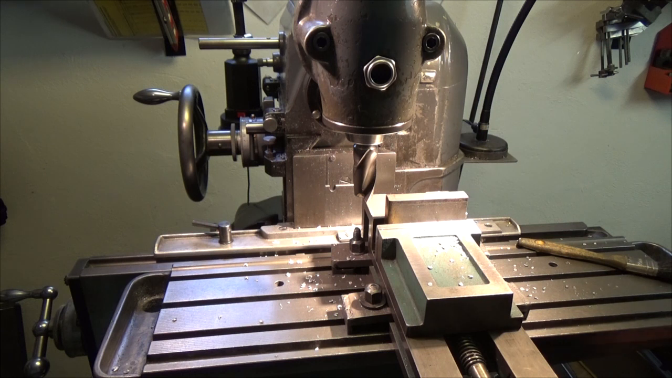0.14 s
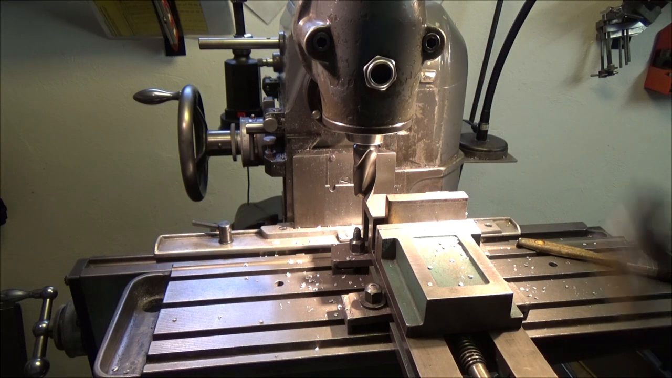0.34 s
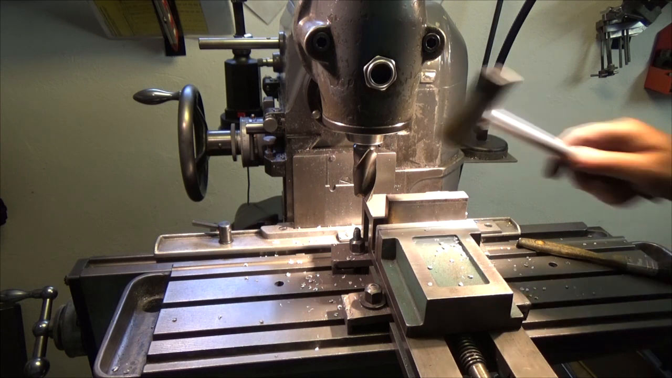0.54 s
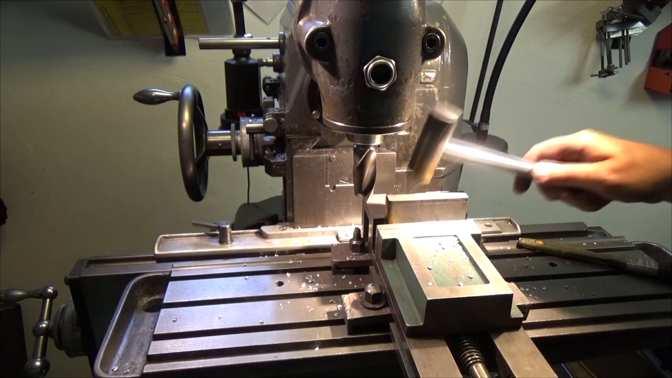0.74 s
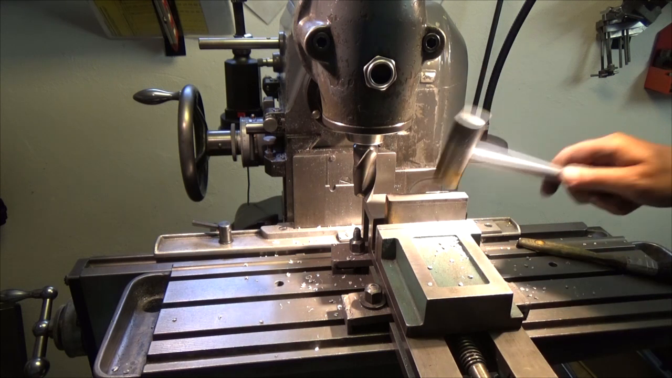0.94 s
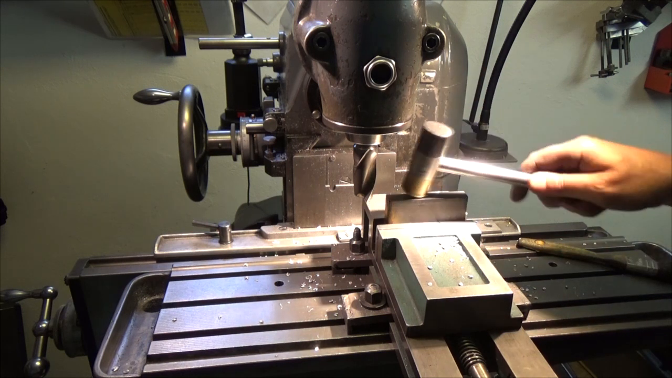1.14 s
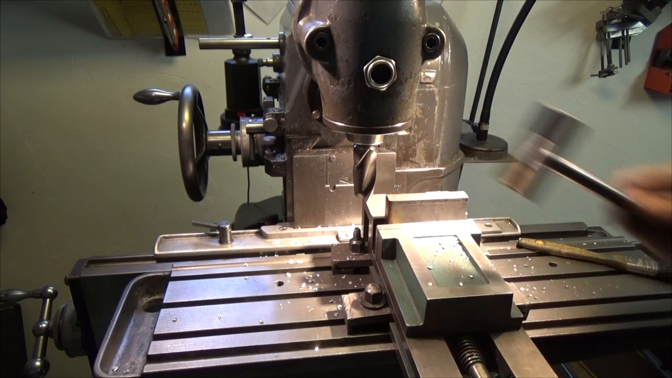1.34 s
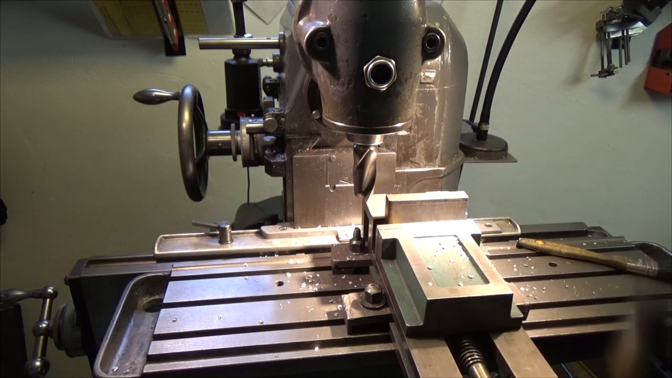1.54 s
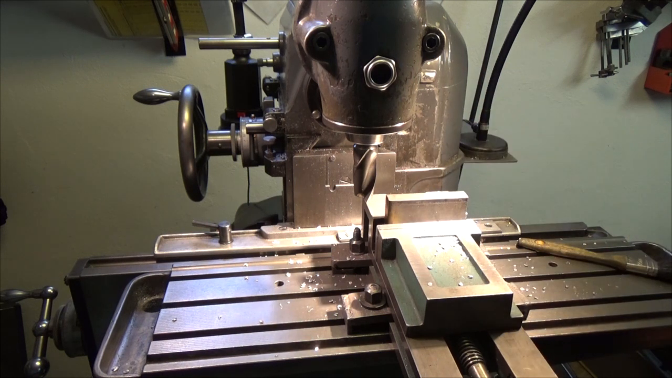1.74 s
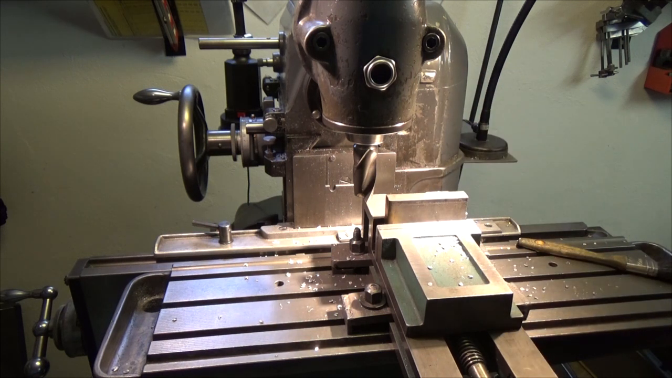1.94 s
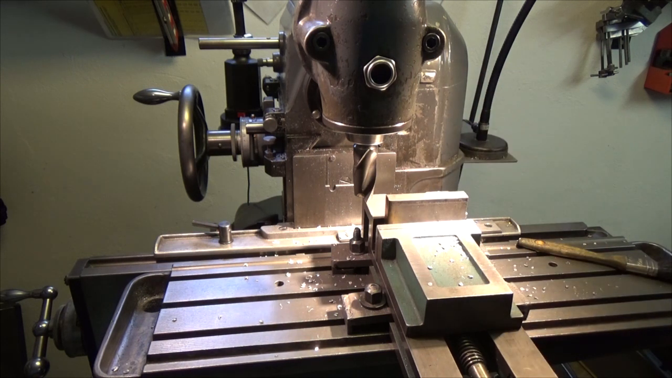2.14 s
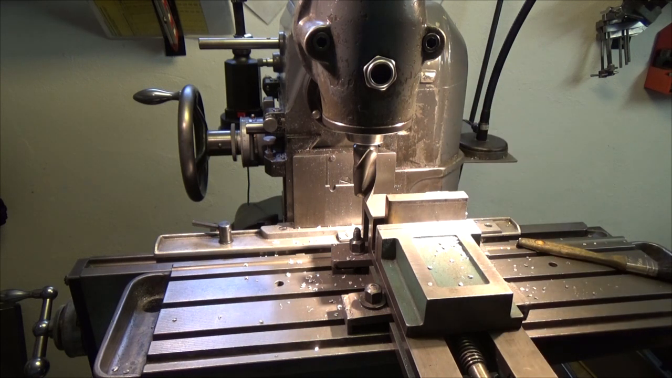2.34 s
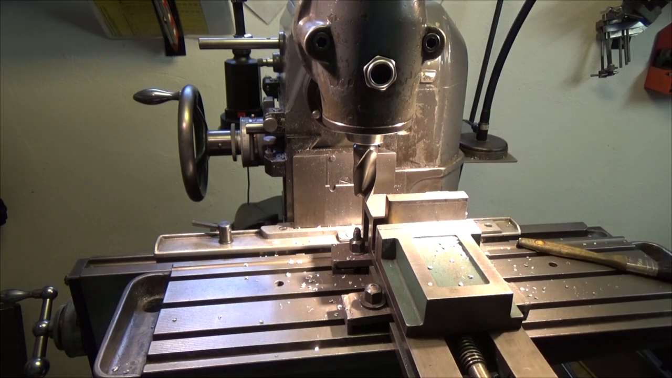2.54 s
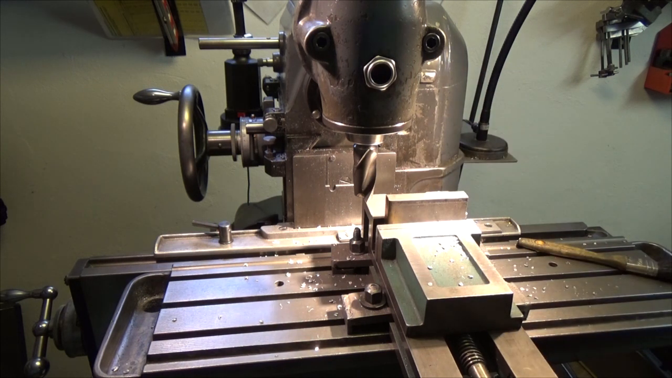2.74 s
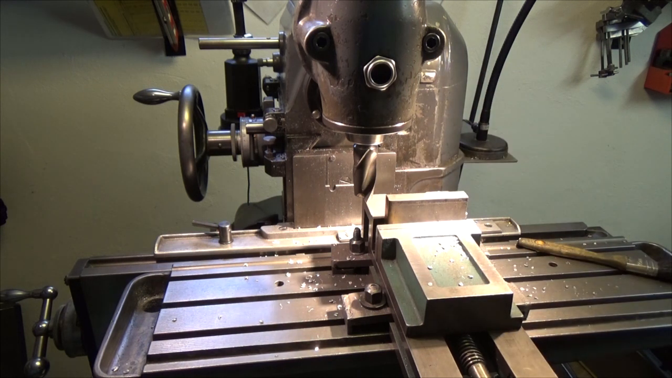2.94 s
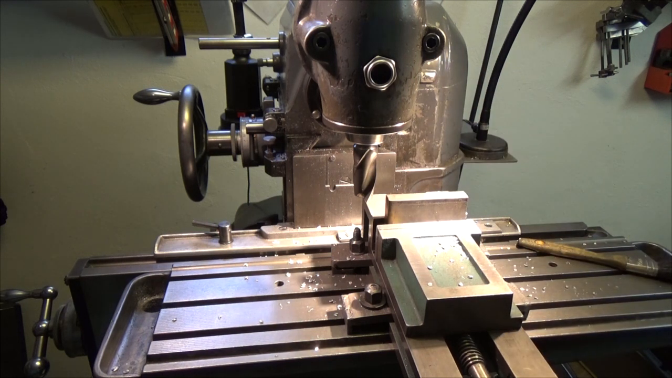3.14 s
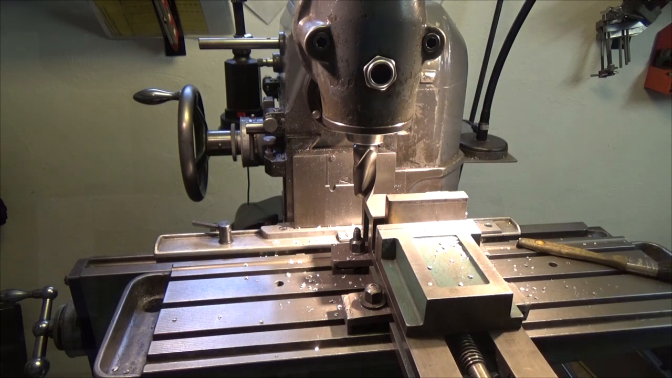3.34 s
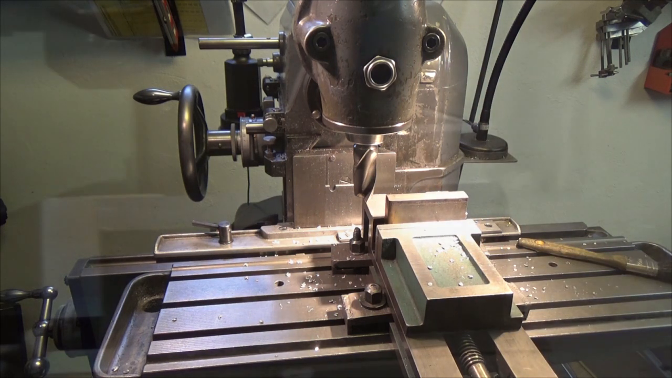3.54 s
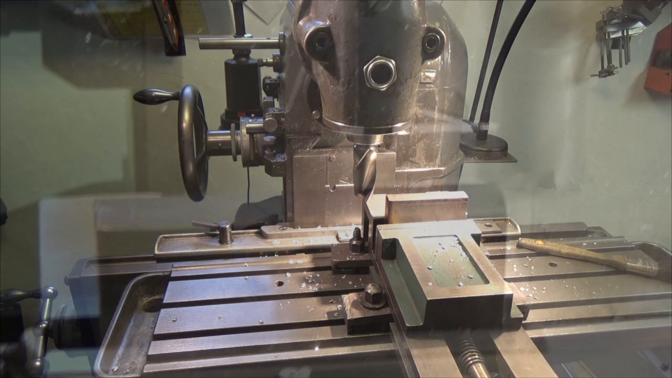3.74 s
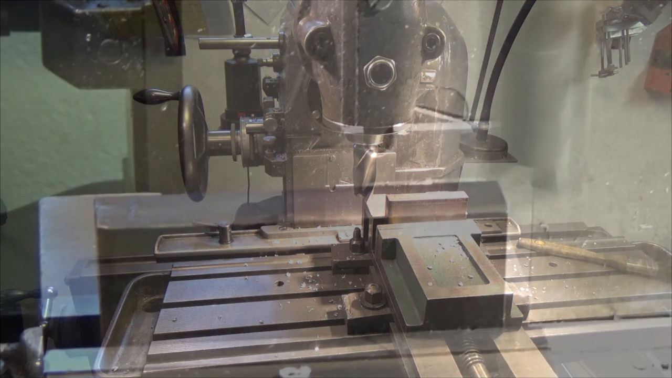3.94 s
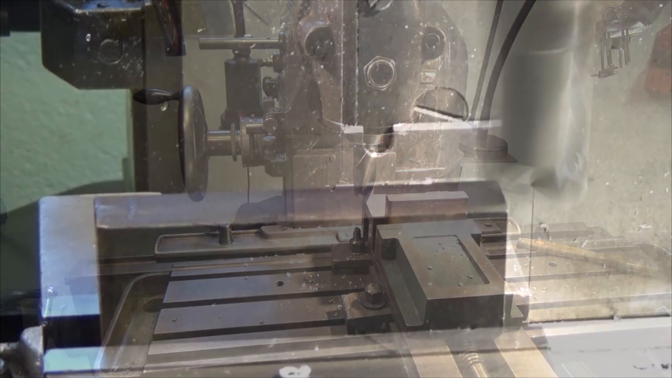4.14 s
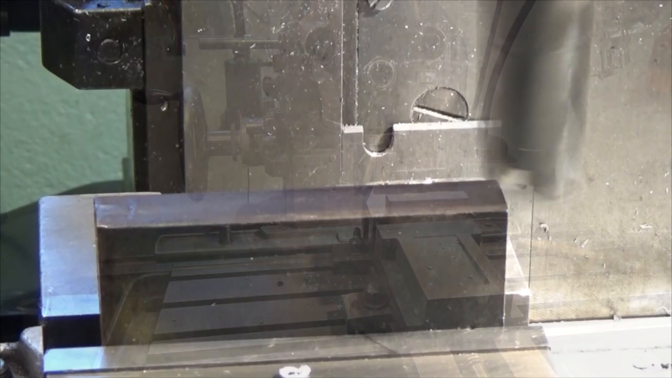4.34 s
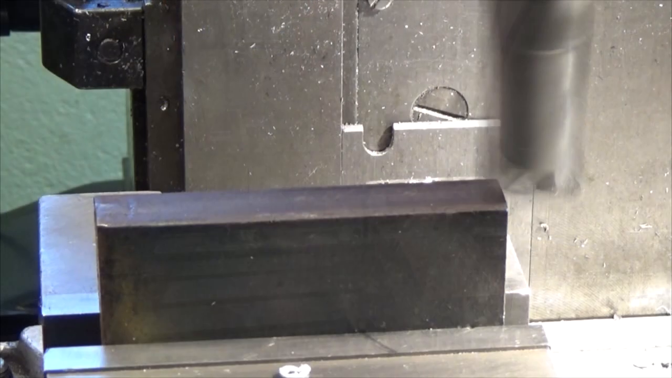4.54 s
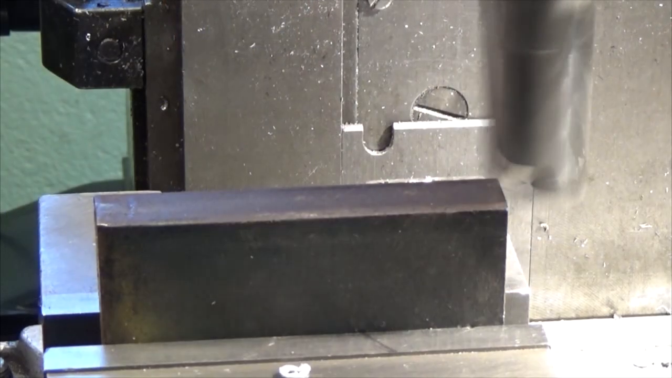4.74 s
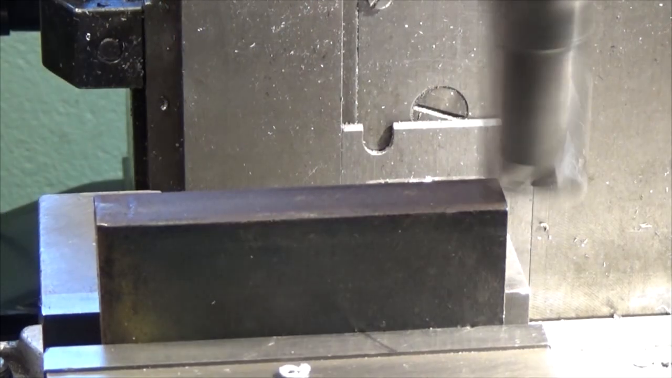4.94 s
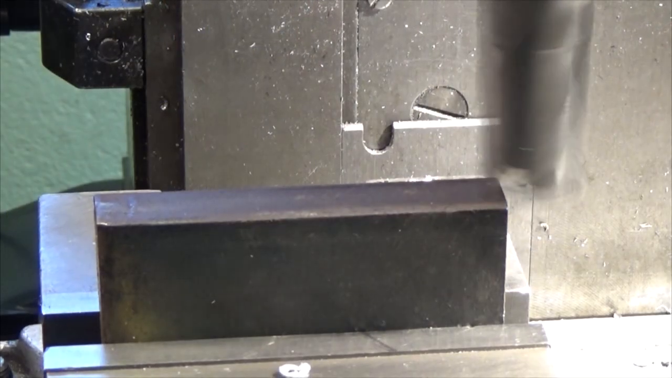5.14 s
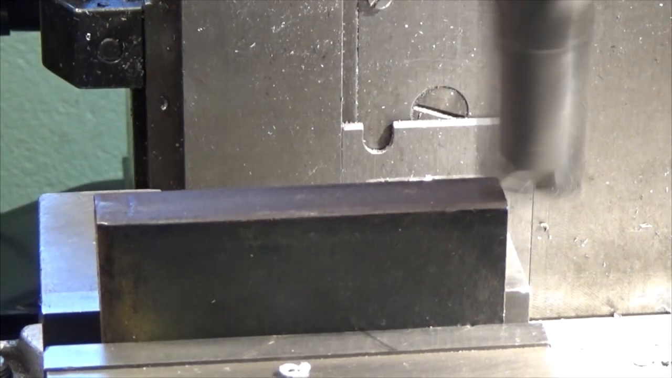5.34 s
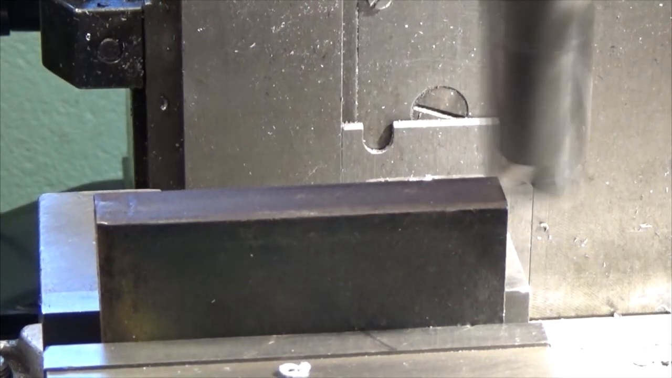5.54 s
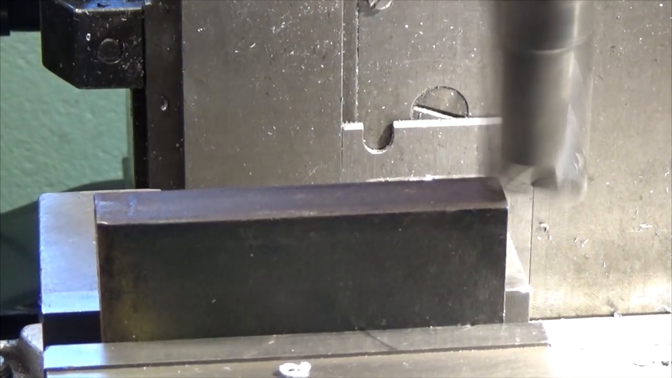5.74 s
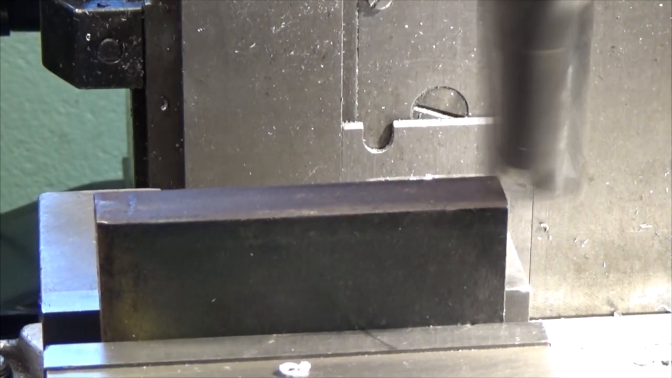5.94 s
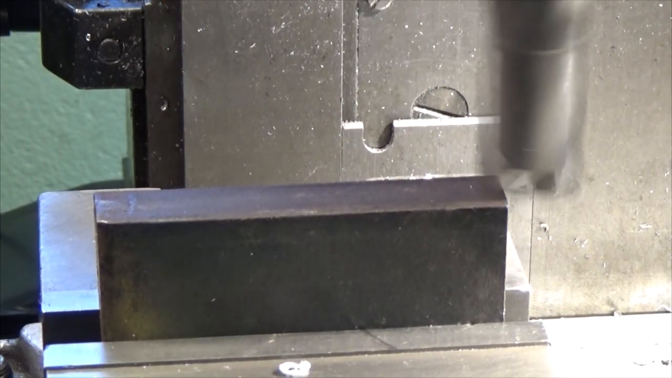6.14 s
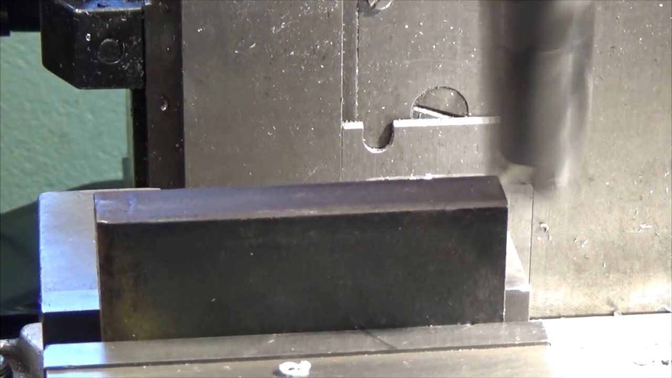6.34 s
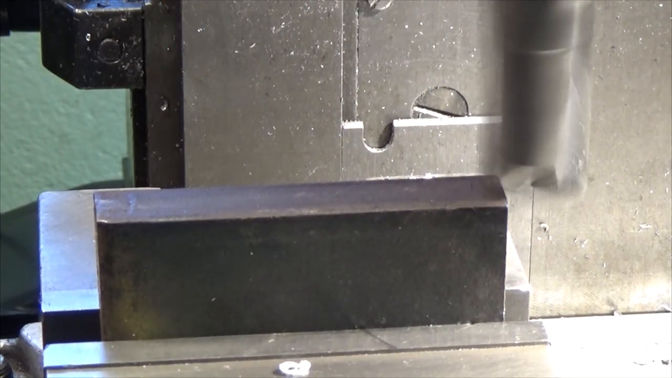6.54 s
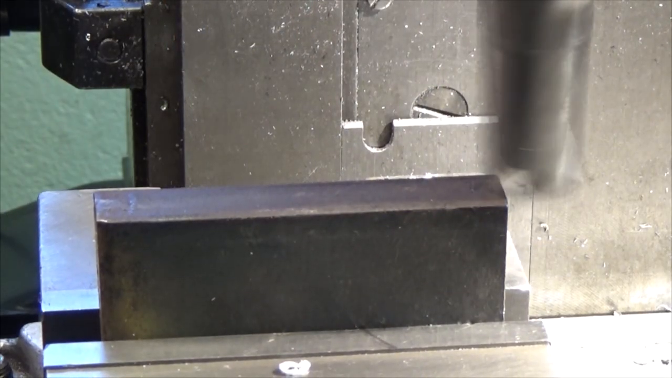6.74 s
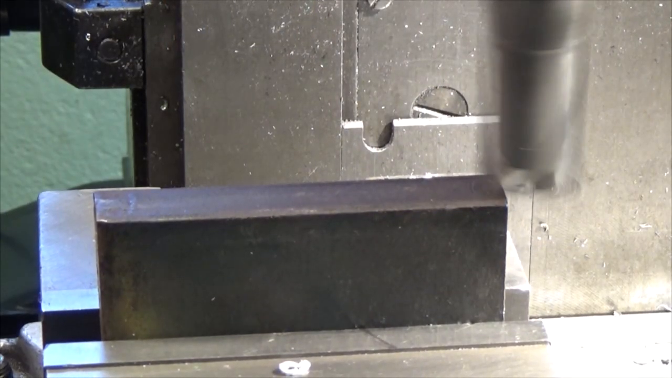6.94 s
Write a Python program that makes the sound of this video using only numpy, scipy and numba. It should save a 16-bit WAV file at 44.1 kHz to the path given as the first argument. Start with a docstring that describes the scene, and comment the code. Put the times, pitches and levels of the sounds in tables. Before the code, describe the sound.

In a quiet small workshop, a faint knock precedes three quick, loud hammer blows on steel, each a bright crash with a ringing vice. The hammer is dropped with a jingling clatter and wooden knocks. A milling machine then fades in, whining and rumbling with a steady bright hiss, amid a few loose metallic clinks. The hammering is heard from a step back, the mill up close.

```python
"""A light knock on a bench, then three hammer blows that seat a steel block in a milling vice.
The hammer clatters down on the bench; then loose metal clinks and the running mill fades in.
Blows are coloured noise with decaying modes; gear tones are fluttering sines over a rumble, and the
cutter is noise that swells once a turn and drives resonances. A fast limiter flattens every blow,
so the room rings up behind it."""
import sys
import numpy as np
from scipy import signal
from scipy.fft import rfft, irfft, next_fast_len
from scipy.io import wavfile
from scipy.ndimage import uniform_filter1d
from numba import njit

SR = 44100
rng = np.random.default_rng(int(sys.argv[2]) if len(sys.argv) > 2 else 0)


def generate_wav(sig):
    """Save sig (samples, or channels by samples) to the path in sys.argv[1] as 16-bit PCM at SR."""
    pcm = np.round(np.clip(np.atleast_2d(sig).T, -1, 1) * 32767).astype(np.int16)
    wavfile.write(sys.argv[1], SR, pcm)


N = 307818
T = np.arange(N) / SR
TAIL = T[:int(1.5 * SR)]  # time axis of one hit

# Room air spectrum: (frequency [Hz], level [dB])
AIR_SPECTRUM = [(25, -25), (60, -1), (95, 3.5), (200, 2), (350, -4), (600, -8), (1200, -10.5),
                (2500, -18.5), (6000, -21.5), (11000, -21.5), (16000, -25)]
# Soft strokes of a hand along the tool: (middle [s], level [dB], length [s])
BRUSHES = [(1.603, -60, 0.052), (1.8, -66, .15), (2.035, -53.5, 0.34)]
# Room reverberation time before stretching: (frequency [Hz], T60 [s])
ROOM_T60 = [(100, 0.57), (260, 0.38), (700, 0.39), (1840, 0.32), (4850, 0.34), (12800, 0.15)]
# Side signal facing the bench: (frequency [Hz], side relative to mid [dB])
PORTS_WIDE = [(60, -19), (200, -22), (1300, -26), (4400, -26), (8000, -15.5), (15000, -60)]
# Side signal facing the cutter: (frequency [Hz], side relative to mid [dB])
PORTS_CLOSE = [(60, -10), (380, -31), (700, -43), (3000, -94), (5500, -17.5), (9000, -14.5), (15000, -45)]
# Motor and gear tones: (frequency [Hz], level [dB], unsteady share [0-1], flutter rate [Hz])
GEAR_TONES = [(95, -36, .3, 5), (212.3, -22, .5, 10), (300.6, -19.5, .5, 10), (529.2, 0, .24, 34),
              (881, -11.3, .5, 22), (985.5, -19.5, .8, 25), (1085.5, -20.5, .8, 30), (1401, -11.8, .9, 42),
              (2060, -20, .92, 45)]
# Bearing rumble spectrum: (frequency [Hz], level [dB])
RUMBLE_SPECTRUM = [(30, -13), (70, -56), (120, -11.5), (200, -4), (310, 5), (450, 1.5), (520, 10.5),
                   (610, 7.5), (690, -3), (850, 4), (1100, -2), (1400, 1.5), (1600, -4), (2200, -6),
                   (4000, -17), (6000, -50)]
# Cutting hiss spectrum: (frequency [Hz], level [dB])
HISS_SPECTRUM = [(1500, -20), (3000, -11), (3900, -12), (4400, -8.5), (4980, -6.5), (5200, 1), (6100, 1.5),
                 (6650, -2.5), (7600, -2.5), (9000, -.7), (10800, -.7), (12000, -5), (13500, -13),
                 (15800, -23)]
# Resonances of cutter and spindle: (frequency [Hz], level [dB])
CUTTER_MODES = [(5164, -2), (5238, 0), (5764, -3), (5923, 0), (6109, 2), (7903, -1), (8091, -2), (8823, -2),
                (8979, -2), (9259, -1), (10110, 0), (10541, -1), (11337, -3), (11682, -2), (12414, -5)]
# Loose metal by the mill: (time [s], clatter [dB], tilt [dB/octave], ring [dB], piece [name])
CLINKS = [(4.026, -19, -0.2, -29, "plate"), (4.078, -35, -1, -24, "washer"),
          (4.187, -24, 4.5, -27.5, "bar"), (4.195, -28, 10, -25, "nut"), (4.249, -28.5, -1.5, -22.5, "bar"),
          (4.274, -24, 9, -33, "pin"), (4.355, -25.5, 4, -27, "rod"), (6.53, -34, -4, -45, "guard"),
          (6.64, -29, -3.5, -35, "guard")]
# Modes of each loose piece of steel, by name: (frequency [Hz], level [dB], T60 [s])
PIECE_MODES = {"plate": [(3950, 0, .3), (4960, -4, .25)], "washer": [(6600, 0, .2), (8780, -1, .12)],
               "nut": [(6245, 0, .15), (8600, -1, .15)], "bar": [(4480, 0, .28), (13620, 0, .3)],
               "pin": [(10387, 0, .4), (12667, -3, .4)], "rod": [(3378, 0, .35), (12667, -1, .4)],
               "guard": [(1500, -3, .1), (1760, 0, .1), (2320, -3, .1)]}
# Tools knocking on the bench: (time [s], force [dB], contact pitch [Hz], tilt [dB/octave],
# crack relative to wash [dB], board ring [dB], shaft ring [dB])
KNOCKS = [(0.002, -29, 1650, -.5, 5, -26, -27.5), (2.19, -4, 1510, -0.6, 9.5, -29, -26),
          (2.208, -9.5, 2500, 1.5, 0, -37, -9), (2.247, -11.5, 8550, 6, 10.5, -50, -6.5),
          (2.265, -17.5, 5300, 0.7, 0, -50, -16), (2.341, -27.5, 10000, -2, 7, -49.5, -37),
          (2.412, -7, 775, 0, -3.5, -24, -33), (2.465, -11.5, 664, 0.9, 2, -25, -23),
          (2.731, -42.5, 850, -3, 9, -75, -66), (2.792, -45.5, 1210, -4, 6, -75, -71.5),
          (3.009, -49.5, 1100, -1.7, 6, -70, -72)]
# Knock spectrum without its contact resonance: (frequency [Hz], level [dB])
KNOCK_SPECTRUM = [(60, -37), (170, 1), (350, 2.5), (700, -3.5), (1600, -2), (3500, -8), (6000, -6.5),
                  (10000, -4), (13000, -12), (16000, -23)]
# Modes of the wooden bench: (frequency [Hz], level [dB], T60 [s])
BENCH_MODES = [(210, -4, .22), (238, 0, .2), (318, -17, .5), (503, -10, .38), (689, -13, .25),
               (915, -14, .18)]
# Modes of the hammer's steel shaft: (frequency [Hz], level [dB], T60 [s])
SHAFT_MODES = [(1106, -12, .12), (1301, -12, .12), (1673, -13, .12), (8300, -9, .04), (8750, -9, .04),
               (9420, -2, .11), (9620, -5, .09), (10020, -4, .1), (11100, -8, .05), (12430, -3, .13),
               (13950, -9, .12)]
# Modes of the hammer's head: (frequency [Hz], level [dB], T60 [s])
HEAD_MODES = [(940, -4, .25), (1168, -1, .27), (1460, -4, .22), (1766, -1, .22), (2223, -7, .22),
              (2912, -6, .18), (3348, -10, .2), (4533, -11, .18)]
# Modes of other tools jingling on the bench: (frequency [Hz], level [dB], T60 [s])
JINGLE_MODES = [(5782, -5, .22), (6406, -8, .27), (8533, -6, .22), (9781, 0, .19), (10900, -7, .17),
                (11710, -5, .16), (12414, -2, .18)]
# Soft, dull bumps on the bench: (time [s], level [dB], pitch [Hz], T60 [s])
THUDS = [(2.367, -18.5, 241, .17), (3.069, -38.5, 316, .05)]
# Low booms of the bench top: (time [s], level [dB])
BOOMS = [(2.465, -37.5), (3.072, -46.5)]
# Hammer blows on the block: (time [s], force [dB], tilt [dB/octave], graze before it [dB],
# vice ring relative to force [dB])
BLOWS = [(0.732, -4.5, 0.5, -31.5, -9), (0.926, -2.5, 2.4, -34, -12.5), (1.114, -5.5, -0.15, -36, -6)]
# Spectrum of steel struck by steel: (frequency [Hz], level [dB])
BLOW_SPECTRUM = [(35, -68), (70, -27), (150, -12.5), (340, -7), (470, -13.5), (900, -8.5), (1450, -5.5),
                 (2850, -7), (3400, -4), (3900, -8), (5500, -11), (6200, -4.5), (7200, -12), (10200, -13.5),
                 (13000, -24.5), (14200, -22.5), (16000, -39)]
# Modes of the vice and machine table: (frequency [Hz], level [dB], T60 [s])
VICE_MODES = [(149, -13, .65), (213, -13, .5), (343, -11, .5), (716, -18, .55), (926, -37, 1.6),
              (1022, -12, .4), (1061, -37, 1.4), (1238, -28, 1.1), (1421, -6, .35), (1451, -5, .35),
              (1616, -9, .3), (1728, -2, .36), (2232, -9, .33), (2590, -9, .36), (3203, -7, .3),
              (3311, -2, .38), (3365, -7, .35), (3440, -7, .3), (3567, -8, .3), (4090, -12, .33),
              (6178, -11, .3), (10100, -14, .3)]

AIR_DB, HUM_DB, HUM_HZ = -54.5, -53.0, 300.5
BUILD_CYCLES, RING_UP_CYCLES = 1, 0.23  # time constants of onset, in periods: room bands, modes
TURN_HZ, BITE_S = 9.21, 5.968  # spindle speed, and a moment when the swell peaks
GEAR_TURN_HZ, GEAR_SLACK_S = 4.46, 6.287  # gear speed, and a moment when the whine dips
WHINE_DB, RUMBLE_DB, HISS_DB = -23.5, -5.5, -22.5  # rumble is relative to the whine
NOD_DB, SPINDLE_NOD_DB = 1.5, 0.48  # level swing, twice per gear turn and twice per spindle turn
REPEAT_SHARE = 0.76  # part of the flutter that comes back with every gear turn
FADE_START_S, FADE_S, FADE_CURVE = 3.222, 1.08, 0.79
LOAD_FROM_S, LOAD_RISE_S = 5.0, 1.0  # the cutter bites into the block
LOAD_SAG = .003  # fraction by which full load lowers the gear tones
SWELL_IDLE_DB, SWELL_LOAD_DB = 1, 0.3  # once-a-turn swell of the hiss, and what the load adds
CONTACT_DB, CONTACT_OCTAVES = 6.5, 0.89  # height and width of the resonance at the contact
HEAD_DB, JINGLE_DB = -10, -12.5  # relative to the force of the knock
THUD_ROOM_DB, THUD_ROOM_TILT_DB = -8.5, -4  # echo relative to the thud, and its dB per octave
BOOM_HZ, BOOM_T60 = 96, 1.54
TOP_HZ = 15750


def undb(db):
    """Level to amplitude: 20 dB is a factor of ten."""
    return 10 ** (np.asarray(db) / 20)


def unit(x):
    """Power normalization: scale to rms 1."""
    return x / np.sqrt(np.mean(x ** 2))


def punch(x):
    """Onset normalization: scale a hit so that its first 20 ms have rms 1."""
    return x / np.sqrt(np.mean(x[:SR // 50] ** 2))


def decay(t, t60):
    """Exponential damping: the amplitude falls by 60 dB in one T60."""
    return np.exp(-np.log(1000) * t / t60)


def along(points, hz):
    """Logarithmic frequency scale: interpolate (Hz, value) points along it."""
    f, value = np.transpose(points)
    return np.interp(np.log(hz + 1), np.log(f), value)


def colour(x, points, tilt_db=0):
    """Linear filtering: multiply the spectrum by a curve, tilted in dB per octave about 3 kHz."""
    size = next_fast_len(len(x) + SR // 2)
    hz = np.fft.rfftfreq(size, 1 / SR)
    gain_db = along(points, hz) + tilt_db * np.log2((hz + 100) / 3000)
    return irfft(rfft(x, size) * undb(gain_db), size)[:len(x)]


def band(x, lo_hz, hi_hz):
    """Causal band-pass: pass one range of frequencies without sounding ahead of the input."""
    edges = [lo_hz, min(hi_hz, SR / 2 - 100)]
    return signal.sosfilt(signal.butter(3, edges, "band", fs=SR, output="sos"), x)


def walk(rate):
    """Band-limited chance: random steps at a rate in Hz, smoothed twice and scaled to rms 1."""
    k = int(SR / rate)
    steps = np.repeat(rng.standard_normal(N // k + 1), k)
    return unit(uniform_filter1d(uniform_filter1d(steps, k), k)[:N])


def add(out, s, x):
    """Superposition: mix x in at time s."""
    i = max(int(s * SR), 0)
    out[i:i + len(x)] += x[:N - i]


def wash(stretch):
    """Diffuse reverberation: in dense ringing and echoes the bass builds late, the treble dies first."""
    edges = np.geomspace(50, 20000, 9)
    noise = rng.standard_normal(len(TAIL))
    total = np.zeros(len(TAIL))
    for lo, hi in zip(edges, edges[1:]):
        hz = np.sqrt(lo * hi)
        build = 1 - np.exp(-TAIL * hz / BUILD_CYCLES)
        total += band(noise, lo, hi) * build * decay(TAIL, stretch * along(ROOM_T60, hz))
    return total


def impact(stretch, crack_db, crack_s):
    """Impulsive excitation: a brief broadband crack of contact joined to its wash."""
    crack = rng.standard_normal(len(TAIL)) * np.exp(-TAIL / crack_s)
    return wash(stretch) + undb(crack_db) * crack


def ring(modes, detune=0):
    """Modal superposition: modes swing up from rest and decay; level, sign and pitch vary by strike."""
    chance = rng.standard_normal((len(modes), 3))
    total = np.zeros(len(TAIL))
    for (hz, db, t60), (level, sign, shift) in zip(modes, chance):
        swing = np.sign(sign) * np.sin(2 * np.pi * hz * (1 + detune * shift) * TAIL)
        rise = 1 - np.exp(-TAIL * hz / RING_UP_CYCLES)
        total += undb(db + level) * swing * rise * decay(TAIL, t60)
    return punch(total)


def shop():
    """Stationary noise and friction: room air, an electric hum and the soft brushing of a hand."""
    air = undb(AIR_DB) * unit(colour(rng.standard_normal(N), AIR_SPECTRUM)) * undb(.5 * walk(18.0))
    hum = undb(HUM_DB) * np.sin(2 * np.pi * HUM_HZ * T) * undb(0.55 * walk(6))
    stroke = np.zeros(N)
    for s, db, length in BRUSHES:
        add(stroke, s - length / 2, undb(db) * np.hanning(int(length * SR)))
    friction = unit(band(rng.standard_normal(N), 6800, 15700)) * undb(2 * walk(61.2))
    return air + hum + stroke * friction


def flutter(rate):
    """Periodic plus random modulation: tooth errors repeat each gear turn, tooth play is random."""
    k = np.arange(1, 17)  # harmonics of the gear turn
    errors = rng.standard_normal((len(k), 2)) @ [1, 1j]
    errors = errors / (1 + (2 * k * GEAR_TURN_HZ / rate) ** 2)
    one_turn = irfft(np.append(0, errors), int(SR / GEAR_TURN_HZ))
    repeated = unit(np.resize(one_turn, N))
    return REPEAT_SHARE * repeated + np.sqrt(1 - REPEAT_SHARE ** 2) * walk(rate)


def gearbox(turn, load):
    """Modulated tooth-mesh tones: they flutter, nod with the shafts and sag under load, over rumble."""
    shaft_time = T + np.cumsum(0.000794 * walk(6) - LOAD_SAG * load) / SR
    tones = np.zeros(N)
    for hz, db, unsteady, flutter_hz in GEAR_TONES:
        # a steady phasor plus one whose amplitude and phase wander
        wander = (flutter(flutter_hz) + 1j * flutter(flutter_hz)) / np.sqrt(2)
        swing = np.sqrt(1 - unsteady ** 2) + unsteady * wander
        tones += undb(db) * np.sqrt(2) * np.real(swing * np.exp(2j * np.pi * hz * shaft_time))
    gear_turn = 2 * np.pi * GEAR_TURN_HZ * (T - GEAR_SLACK_S)
    nod_db = -NOD_DB * np.cos(2 * gear_turn) + SPINDLE_NOD_DB * np.cos(2 * turn)
    nod = undb(nod_db + 0.98 * walk(55) + 0.3)
    rumble = unit(colour(rng.standard_normal(N), RUMBLE_SPECTRUM)) * undb(0.82 * walk(40))
    return tones * nod + undb(RUMBLE_DB) * rumble


def cutter(turn, load):
    """Forced vibration: fine rubbing grains swell once a turn and ring the cutter and the casting."""
    bite = (.5 + .5 * np.cos(turn + .35 * walk(5))) ** 2
    depth_db = SWELL_IDLE_DB + SWELL_LOAD_DB * load
    swell = undb(depth_db * bite + 1.5 * walk(500) + 0.32 * walk(25))
    rub, drive = rng.standard_normal((2, N)) * swell
    casting = signal.fftconvolve(drive, wash(stretch=0.59))[:N]
    hiss = unit(colour(unit(rub) + undb(1.5) * unit(casting), HISS_SPECTRUM))
    brief = TAIL[:SR // 5]
    modes = sum(undb(db) * np.sin(2 * np.pi * hz * brief) for hz, db in CUTTER_MODES)
    ringing = unit(signal.fftconvolve(drive, modes * decay(brief, 0.17))[:N])
    return undb(-.5) * hiss + undb(-10) * ringing


def mill():
    """Common drive: gearbox and cutter share one turn; load lowers the gear tones and deepens the throb."""
    fade = np.clip((T - FADE_START_S) / FADE_S, 0, 1) ** FADE_CURVE
    load = np.clip((T - LOAD_FROM_S) / LOAD_RISE_S, 0, 1)
    turn = 2 * np.pi * TURN_HZ * (T - BITE_S)
    return fade * (undb(WHINE_DB) * gearbox(turn, load) + undb(HISS_DB) * cutter(turn, load))


def clinks():
    """Free vibration of small bodies: loose bits of steel clatter and ring at their own modes."""
    out = np.zeros(N)
    for s, db, tilt_db, ring_db, piece in CLINKS:
        noise = impact(stretch=1.67, crack_db=-18, crack_s=0.0054)
        clatter = punch(colour(noise, BLOW_SPECTRUM, tilt_db))
        add(out, s, undb(db) * clatter + undb(ring_db) * ring(PIECE_MODES[piece]))
    return out


def contact(hz):
    """Contact resonance: the knock spectrum with a broad peak at the pitch of its contact."""
    f = np.geomspace(40, 18000, 60)
    peak_db = CONTACT_DB * np.exp(-(np.log2(f / hz) / CONTACT_OCTAVES) ** 2)
    return np.transpose([f, along(KNOCK_SPECTRUM, f) + peak_db])


def bench():
    """Coupled impact: a knock rings head, shaft and board, other tools jingle; thuds and booms follow."""
    out = np.zeros(N)
    for s, db, hz, tilt_db, crack_db, board_db, shaft_db in KNOCKS:
        noise = impact(stretch=1.007, crack_db=crack_db, crack_s=0.0034)
        knock = punch(colour(noise, contact(hz), tilt_db))
        head = undb(HEAD_DB) * ring(HEAD_MODES, detune=0.00382)
        jingle = undb(JINGLE_DB) * ring(JINGLE_MODES)
        board = undb(board_db) * ring(BENCH_MODES)
        shaft = undb(shaft_db) * ring(SHAFT_MODES, detune=.004)
        add(out, s, undb(db) * (knock + head + jingle) + board + shaft)
    # the head brushes the board just before it lands
    add(out, 2.184, undb(-30) * punch(band(wash(stretch=0.29), 700, 4000)))
    for s, db, hz, t60 in THUDS:
        echo = punch(colour(wash(stretch=1.5), contact(2 * hz), THUD_ROOM_TILT_DB))
        add(out, s, undb(db) * (ring([(hz, 0, t60)]) + undb(THUD_ROOM_DB) * echo))
    for s, db in BOOMS:
        add(out, s, undb(db) * np.sin(2 * np.pi * BOOM_HZ * TAIL) * decay(TAIL, BOOM_T60))
    return out


def hammer():
    """Impact excitation of modes: each blow grazes the block, then lands and rings the vice."""
    out = np.zeros(N)
    for s, db, tilt_db, graze_db, ring_db in BLOWS:
        noise = impact(stretch=1., crack_db=2, crack_s=0.004)
        crash = punch(colour(noise, BLOW_SPECTRUM, tilt_db))
        add(out, s, undb(db) * (crash + undb(ring_db) * ring(VICE_MODES, detune=.0007)))
        graze = punch(band(wash(stretch=.3), 600, 5000))
        add(out, s - .009, undb(graze_db) * graze)
    return out


def ports(mid, offset):
    """Phase difference: a quadrature side signal sets two close ports slightly apart in phase."""
    quadrature = np.imag(signal.hilbert(mid, next_fast_len(N)))[:N]
    side = colour(quadrature, offset)
    return np.array([mid + side, mid - side])


def scene():
    """Superposition of two fields: hammering from a step back, the running mill from close up."""
    far = ports(shop() + bench() + hammer(), PORTS_WIDE)
    near = ports(mill() + clinks(), PORTS_CLOSE)
    return far + near


@njit
def follow(x, attack, release):
    """Envelope detection: one-pole smoothing with unequal rise and fall."""
    out, e = np.empty(len(x)), 0.
    for i in range(len(x)):
        e += (x[i] - e) * (attack if x[i] > e else release)
        out[i] = e
    return out


def record(dry, ceiling_db=-7.0, attack_s=0.000094, release_s=0.028):
    """Gain reduction: a fast limiter holds the blows at one level; deep bass and the top are cut."""
    peak = np.abs(dry).max(axis=0)
    envelope = follow(peak, 1 / (1 + attack_s * SR), 1 / (1 + release_s * SR))
    ahead = np.pad(envelope, (0, SR // 1000), mode="edge")[-N:]  # look 1 ms ahead
    limited = dry * np.minimum(1, undb(ceiling_db) / (ahead + 1e-9))
    thin = signal.sosfilt(signal.butter(1, 60, "high", fs=SR, output="sos"), limited)
    return signal.sosfilt(signal.ellip(10, .2, 80, TOP_HZ, fs=SR, output="sos"), thin)


dry = scene()
out = record(dry)
generate_wav(out)
```